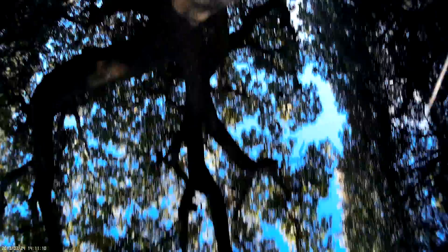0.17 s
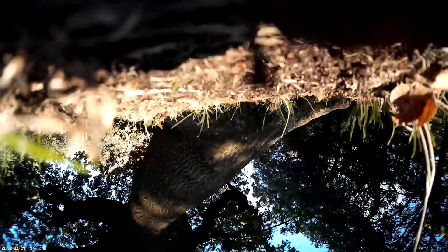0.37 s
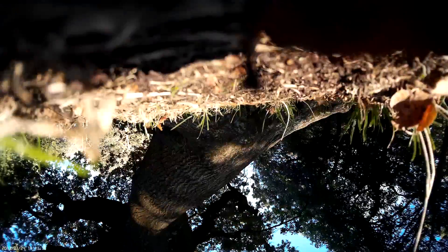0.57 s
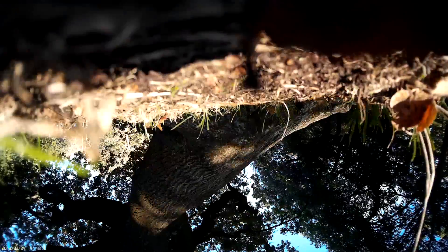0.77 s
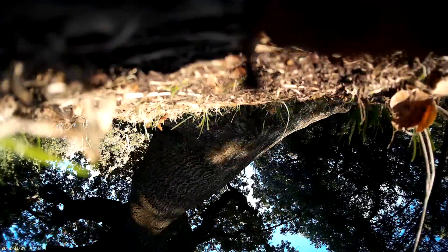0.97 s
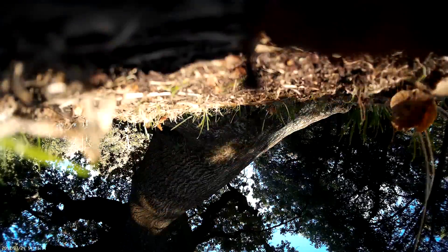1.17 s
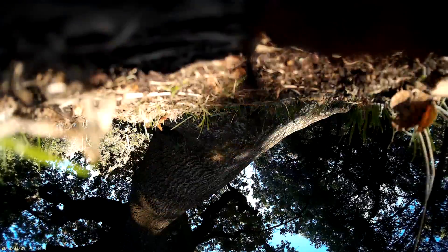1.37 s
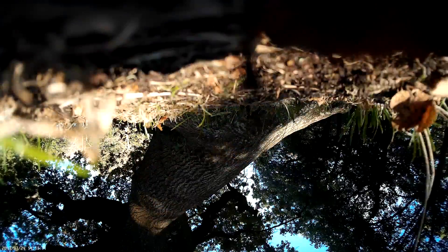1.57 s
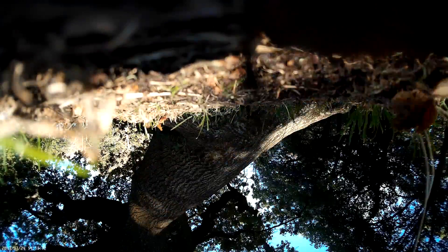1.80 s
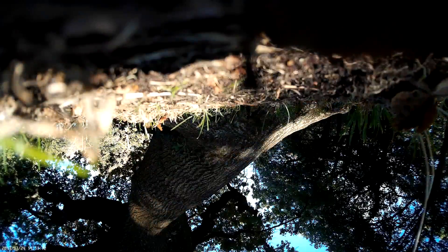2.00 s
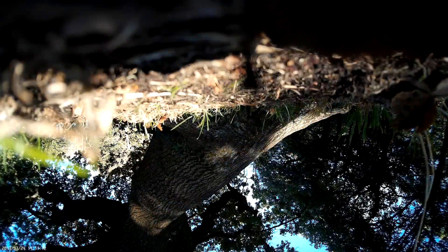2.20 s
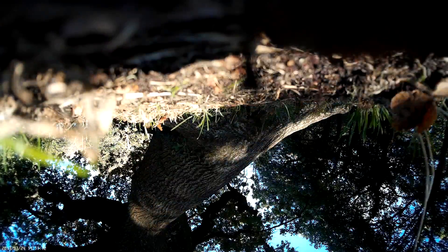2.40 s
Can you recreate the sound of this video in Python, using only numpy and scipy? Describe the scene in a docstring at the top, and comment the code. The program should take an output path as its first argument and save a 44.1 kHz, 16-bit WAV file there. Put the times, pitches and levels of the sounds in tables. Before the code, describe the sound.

A small drone crashes right at the microphone: dry leaves tick, then sharp cracks and a thud hit at about 0.25 seconds, with a short tumble scraping to rest by 0.5. From around 1 second a second, distant drone hums and whines closer, much quieter than the crash, peaking near 1.9 seconds before dropping in pitch and easing off. Light wind rumbles throughout.

```python
"""Outdoors, down in dry leaf litter, on the microphone of a small drone's own camera.
Right at the microphone the drone clips leaves, cracks and thuds onto the soil, tumbles and scrapes
to rest. Some way off a second quadcopter comes nearer, its four rotors humming and whining at their
blade-pass pitches and overtones, then throttles back and flies on.
Light wind rumbles at the microphone throughout; the camera's limiter holds down the hardest hits."""
import sys
import numpy as np
from scipy import signal
from scipy.fft import rfft, irfft, next_fast_len
from scipy.io import wavfile
from scipy.ndimage import uniform_filter1d, minimum_filter1d, map_coordinates

SR = 44100
rng = np.random.default_rng(int(sys.argv[2]) if len(sys.argv) > 2 else 0)


def store_wav(level_fs):
    """Save 16-bit WAV to argv[1]."""
    pcm = np.round(np.clip(np.atleast_2d(level_fs), -1, 1) * 32767)
    wavfile.write(sys.argv[1], SR, pcm.T.astype(np.int16))


N = 108045

# wind at the microphone (frequency [Hz], relative level [dB])
WIND_SPECTRUM = [(20, -6), (50, 1.5), (100, -4.5), (170, -5), (330, -11.5), (700, -12.5), (1700, -13.5),
                 (2500, -24.5), (5000, -26), (10000, -42)]
# the frame sliding through the litter (time [s], level [dB])
SLIDE_LEVEL = [(0, -54.5), (.14, -46.5), (.16, -40.5), (.214, -43), (.217, -31), (.243, -28.5), (.254, -19),
               (.267, -39), (.278, -28), (.29, -44.5), (.312, -27), (.33, -30.5), (.348, -35.5),
               (.385, -43), (.41, -43), (.44, -53.5), (.56, -63.5), (.62, -100)]
# rustling grass and leaves (frequency [Hz], relative level [dB])
LITTER_SPECTRUM = [(200, -2), (900, -0.5), (1700, 3), (2500, -2.5), (4500, 1), (7500, -5.5), (12000, -11.5),
                   (16000, -28.5)]
# crunching soil (frequency [Hz], relative level [dB])
SOIL_SPECTRUM = [(40, 0), (120, -5), (350, -4), (750, -2.5), (1100, -5.5), (1700, 1), (2600, -20.5),
                 (5000, -38)]
# leaves and twigs flicking the frame early on, then small knocks as the frame tumbles (time [s], relative level
# [dB])
TICKS = [(0.041, -34.5), (.0722, -23), (0.081, -28), (.1085, -27.5), (.155, -24.5), (0.1659, -26),
         (.1693, -24), (.1735, -30.5), (0.1797, -19), (0.2727, -9.5), (.2765, -17.5), (.3357, -14.5),
         (.3568, -23), (.402, -27)]
# a crack on the frame, heard close up (frequency [Hz], relative level [dB])
CRACK_SPECTRUM = [(100, -12), (700, -3), (1700, -3), (2400, -3.5), (3500, 4.5), (7000, 2.5), (11500, -4.5),
                  (14500, -16.5), (16000, -17)]
# hard hits on frame and propellers
# (time [s], crack level [dB], ring frequency [Hz], ring level [dB], ring t60 [s])
CONTACTS = [(0.1916, -38, 1720, -16, 0.0058), (0.1921, -24, 3970, -16.5, 0.0066),
            (0.2468, -15, 1910, -10.5, .02), (0.2502, -1.5, 4880, 1.5, 0.0048),
            (.2532, -8, 710, -13, 0.028), (0.2538, -16.5, 1602, -4.5, 0.017), (0.256, 2, 7260, -3, .007),
            (0.258, -14, 1700, -3.5, 0.012), (0.2723, -17.5, 7300, -1, 0.0055),
            (0.303, -21, 1890, -12, 0.0073), (0.3131, -15.5, 4200, -20.5, 0.018),
            (0.319, -8, 3110, 3.5, 0.0076), (0.3379, -13, 7490, -12.5, 0.0087),
            (0.3555, -22, 3370, -17, 0.0061), (0.3586, -24, 3250, -12.5, 0.0061)]
# the body landing on soil (time [s], level [dB], frequency [Hz])
THUDS = [(0.224, -29.5, 60), (0.2478, -18.5, 168), (0.2597, -5.5, 205.7), (0.32, -14, 120)]
# the frame slipping to rest (time [s], level [dB], resonance [Hz], rise [s])
SCRAPES = [(0.3729, -23.5, 1730, 0.0013), (0.3722, -25, 2910, 0.0022), (.402, -27.5, 5300, 0.00082),
           (.414, -29, 5030, 0.0026), (0.42, -25, 4500, .0012), (0.4766, -32.5, 3030, .0008),
           (0.4816, -32.5, 2200, 0.00079), (.488, -36, 2850, 0.00087)]

# the far quadcopter's four rotors, A the strongest (time [s], blade-pass pitch [Hz])
ROTOR_A = [(.6, 465), (1.25, 480), (1.45, 489), (1.62, 505), (1.76, 508), (1.85, 501), (1.92, 511),
           (2.04, 478), (2.12, 449), (2.25, 442), (2.45, 445)]
ROTOR_B = [(1, 394), (1.35, 400), (1.6, 414), (1.88, 421), (2, 390), (2.1, 360), (2.17, 352), (2.25, 367),
           (2.45, 370)]
ROTOR_C = [(1.2, 450), (1.85, 428), (1.98, 445), (2.11, 451), (2.25, 425), (2.45, 406)]
ROTOR_D = [(1.95, 310), (2.2, 345), (2.4, 308)]
# rotors B to D (pitch table, hum offset [dB], whine offset [dB], imbalance [dB])
WEAKER_ROTORS = [(ROTOR_B, -2.6, -5, -21), (ROTOR_C, -7, -6, 0), (ROTOR_D, -8.5, -17, -11)]
# rotor A's hum (time [s], level [dB])
HUM_LEVEL = [(.9, -66.5), (1.3, -56), (1.6, -55), (1.79, -48.5), (1.97, -53), (2.13, -50.5), (2.22, -56),
             (2.36, -50.5)]
# rotor A's overtones together (time [s], relative level [dB])
WHINE_LEVEL = [(1, -64.5), (1.4, -56), (1.6, -56), (1.66, -54.5), (1.84, -48.5), (1.895, -42.5), (2, -47.5),
               (2.12, -48), (2.19, -57)]
# weighting of every rotor's overtones (frequency [Hz], relative level [dB])
WHINE_SPECTRUM = [(600, -1), (1000, -4), (1250, -1), (1500, -0.5), (1680, -6), (1850, -4), (2600, -21),
                  (3800, -13), (8000, -24.5)]
# the quadcopter's swell with throttle and distance (time [s], relative level [dB])
PASS_LEVEL = [(0, -16.5), (.6, -16.5), (1.1, -13.5), (1.33, -9), (1.62, -7.5), (1.68, -2.5), (1.74, -4),
              (1.91, -1.1), (2.135, -1), (2.19, -10), (2.34, -9), (2.45, -9.5)]
# air pushed down by the rotors (frequency [Hz], relative level [dB])
WASH_SPECTRUM = [(40, 0), (130, -6), (220, -5), (420, -4), (580, -6.5), (850, -2), (1300, 0.5),
                 (1900, -2.5), (2300, -12), (2800, -34), (5000, -33.5)]
# fizz of the blade tips (frequency [Hz], relative level [dB])
FIZZ_SPECTRUM = [(1200, -21), (2800, -4), (3800, 8), (4400, -1), (5000, 3), (5750, -7), (6400, -0.5),
                 (7000, -3.5), (7500, -2.5), (8800, -10.5), (12000, -13.5), (16000, -36.5)]

FLUTTER_PER_S = 24  # how fast the rotors' sound wavers in the air


def amp(db):
    """Decibels to gain."""
    return 10 ** (np.asarray(db) / 20)


def unit(x):
    """Scale to rms 1."""
    return x / np.sqrt(np.mean(x ** 2) + 1e-20)


def level_at(spectrum, hz):
    """A spectrum's level in dB at hz, read along a log frequency axis."""
    frequencies, levels = np.transpose(spectrum)
    return np.interp(np.log(hz + 1), np.log(frequencies + 1), levels)


def curve(rows):
    """(time [s], value) points joined up, one value per sample."""
    return np.interp(np.arange(N) / SR, *np.transpose(rows))


def wobble(rate):
    """A smooth random curve, rate knots a second."""
    return map_coordinates(rng.standard_normal(512), [np.arange(N) * rate / SR])


def filtered(x, response):
    """Filter x by a gain that is a function of frequency."""
    size = next_fast_len(N + SR // 2)
    return irfft(rfft(x, size) * response(np.fft.rfftfreq(size, 1 / SR)), size)[:N]


def coloured(x, spectrum):
    """x shaped by the spectrum, at rms 1."""
    return unit(filtered(x, lambda hz: amp(level_at(spectrum, hz))))


def noise(spectrum):
    """Coloured noise of rms 1."""
    return coloured(rng.standard_normal(N), spectrum)


def dying(start, t60):
    """Envelope that jumps up at start and falls 60 dB in t60 seconds."""
    t = np.arange(N) / SR - start
    return (t >= 0) * np.exp(-np.log(1000) * np.clip(t / t60, 0, 10))


def wind(level_db=-50.5, gust_db=1.5):
    """Light wind on the microphone: a low, gently gusting rumble."""
    return amp(level_db + gust_db * wobble(16)) * noise(WIND_SPECTRUM)


def crackle(spectrum, grains_per_s=1800, spread_db=4.5, bed_gain=0.6):
    """Dense grains of uneven size on a bed of noise, rms 1."""
    sizes = amp(spread_db * rng.standard_normal(N)) * rng.choice([-1, 1], N)
    grains = unit(sizes * (rng.random(N) < grains_per_s / SR))
    return coloured(grains + bed_gain * rng.standard_normal(N), spectrum)


def litter_slide(landing_s=0.245, soil_db=1.5):
    """Grass and leaves brush the frame, close up; from the landing on, soil crunches under it too."""
    grounded = np.arange(N) / SR > landing_s
    rustle = crackle(LITTER_SPECTRUM)
    crunch = amp(soil_db) * grounded * crackle(SOIL_SPECTRUM)
    return amp(curve(SLIDE_LEVEL)) * (rustle + crunch)


def ticks(snap_db=1, t60=0.0041):
    """Dry leaves and twigs snap on the frame beside the microphone, and later the tumbling frame knocks
    lightly: each a sharp flick and a noisy tail."""
    flicks = np.zeros(N)
    for start, db in TICKS:
        flicks[round(start * SR)] += amp(db + snap_db)
    snaps = filtered(flicks, lambda hz: amp(level_at(CRACK_SPECTRUM, hz)))
    tails = sum(amp(db) * dying(start, t60) for start, db in TICKS)
    return snaps + tails * noise(CRACK_SPECTRUM)


def ring(start, hz, t60, attack_s=0.0005, blur_rad=0.32, size=4096):
    """One damped, slightly unsteady mode of a struck part."""
    t = np.arange(size) / SR
    blur = blur_rad * map_coordinates(rng.standard_normal(size), [t * hz / 2])
    envelope = np.exp(-np.log(1000) * t / t60) * (1 - np.exp(-t / attack_s))
    tone = envelope * np.sin(2 * np.pi * hz * t + blur)
    first = round(start * SR)
    return np.pad(tone, (first, N - first - size))


def clatter(crack_t60=0.0073, lower_mode_ratio=0.93, lower_mode_db=-15):
    """Each hard contact cracks and briefly rings two neighbouring modes of the part that was hit."""
    bursts = sum(amp(db) * dying(start, crack_t60) for start, db, *_ in CONTACTS)
    cracks = bursts * noise(CRACK_SPECTRUM)
    rings = np.zeros(N)
    for start, _, hz, db, t60 in CONTACTS:
        main_mode = ring(start, hz, t60)
        lower_mode = amp(lower_mode_db) * ring(start, hz * lower_mode_ratio, t60)
        rings += amp(db) * (main_mode + lower_mode)
    return cracks + rings


def thuds(t60_cycles=2.6):
    """The body lands on soil: low tones that die within a few cycles."""
    return sum(amp(db) * ring(start, hz, t60_cycles / hz) for start, db, hz in THUDS)


def scrapes(resonance_q=7.6, grit_db=-10):
    """The frame drags to rest: each gritty slip swells and fades in the rubbing part's resonance."""
    out = np.zeros(N)
    for start, db, hz, rise_s in SCRAPES:
        age = np.clip((np.arange(N) / SR - start) / rise_s, 0, 20)  # in rise times
        envelope = age * np.exp(1 - age)
        resonance = signal.lfilter(*signal.iirpeak(hz, resonance_q, SR), rng.standard_normal(N))
        rub = unit(envelope * resonance) * np.sqrt(np.mean(envelope ** 2))
        grit = amp(grit_db) * envelope * noise(CRACK_SPECTRUM)
        out += amp(db) * (rub + grit)
    return out


def rotor(pitch, hum_db, whine_db, imbalance_db, jitter=0.003, flutter_db=2.3):
    """One propeller: blade-pass hum, odd shaft tones from imbalance, overtones fluttering in the air."""
    hz = curve(pitch) * (1 + jitter * wobble(120))
    phase = 2 * np.pi * (np.cumsum(hz) / SR + rng.random())
    shaft_tones = np.sin(phase / 2) + 0.5 * np.sin(1.5 * phase)  # two blade passes a turn
    hum = amp(flutter_db * wobble(FLUTTER_PER_S)) * (np.sin(phase) + amp(imbalance_db) * shaft_tones)
    whine = np.zeros(N)
    for harmonic in range(2, 16):
        db = level_at(WHINE_SPECTRUM, harmonic * hz) + flutter_db * wobble(FLUTTER_PER_S)
        whine += amp(db) * np.sin(harmonic * phase + 2 * np.pi * rng.random())
    return amp(hum_db) * hum + amp(whine_db) * whine


def passing_drone(whine_db=-46.5, wash_db=-45, fizz_db=-49, whine_swell=1.25, fizz_swell=1.056):
    """Some way off: four rotors, one working hardest, over their rushing wash and blade-tip fizz."""
    pass_db, hum_db = curve(PASS_LEVEL), curve(HUM_LEVEL)
    tones = rotor(ROTOR_A, hum_db, curve(WHINE_LEVEL), imbalance_db=-21)
    weaker_whine_db = whine_db + whine_swell * pass_db
    for pitch, hum_offset, whine_offset, imbalance_db in WEAKER_ROTORS:
        tones += rotor(pitch, hum_db + hum_offset, weaker_whine_db + whine_offset, imbalance_db)
    rush_db = pass_db + 0.7 * wobble(FLUTTER_PER_S)  # wash and fizz waver together
    wash = amp(wash_db + rush_db) * noise(WASH_SPECTRUM)
    fizz = amp(fizz_db + fizz_swell * rush_db) * noise(FIZZ_SPECTRUM)
    return tones + wash + fizz


def scene():
    """In mono: the crash at the microphone, the other drone farther off, wind under both."""
    crash = ticks() + clatter() + thuds() + scrapes() + litter_slide()
    return (crash + passing_drone() + wind())[None]


def record(dry, ceiling=0.89, limiter_s=0.0006, top_hz=15900):
    """The camera's fast limiter holds down the loudest peaks; nothing is kept above its band limit."""
    window = 2 * round(limiter_s * SR / 2) + 1
    needed_gain = ceiling / np.maximum(abs(dry[0]), ceiling)
    smooth_gain = uniform_filter1d(minimum_filter1d(needed_gain, window), window)
    return filtered(dry[0] * smooth_gain, lambda hz: hz < top_hz)[None]


dry = scene()
out = record(dry)
store_wav(out)
```